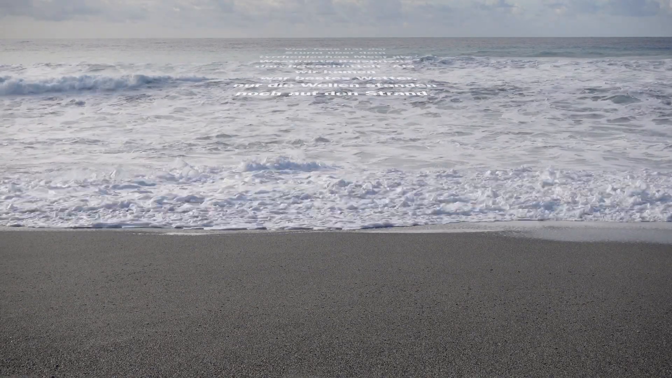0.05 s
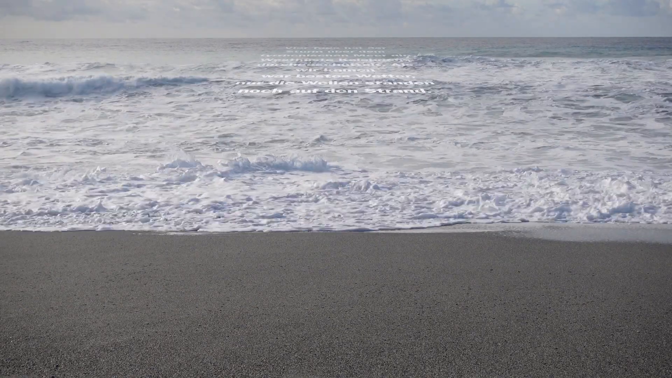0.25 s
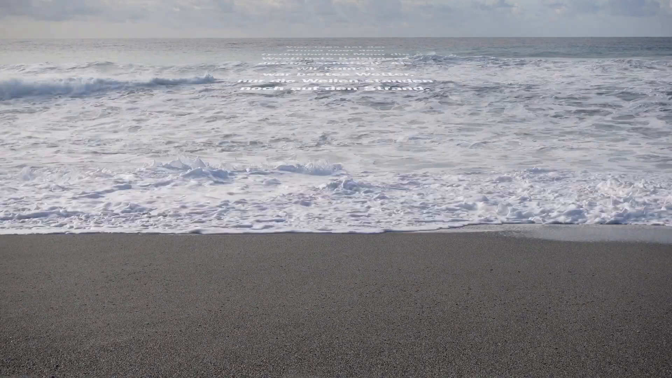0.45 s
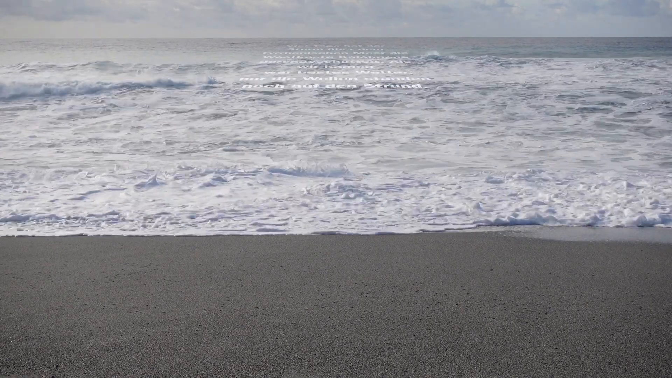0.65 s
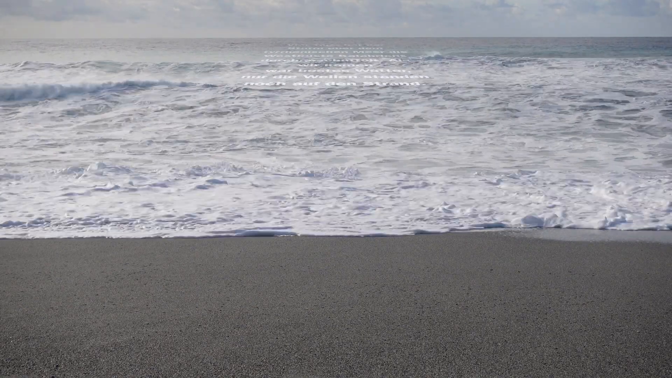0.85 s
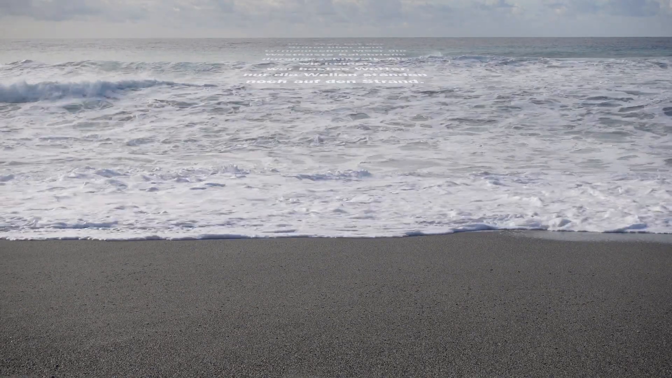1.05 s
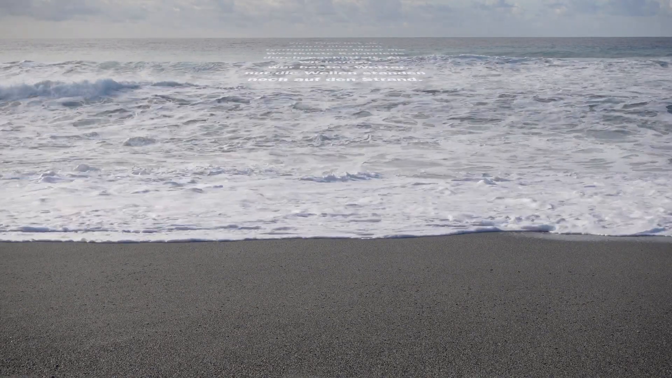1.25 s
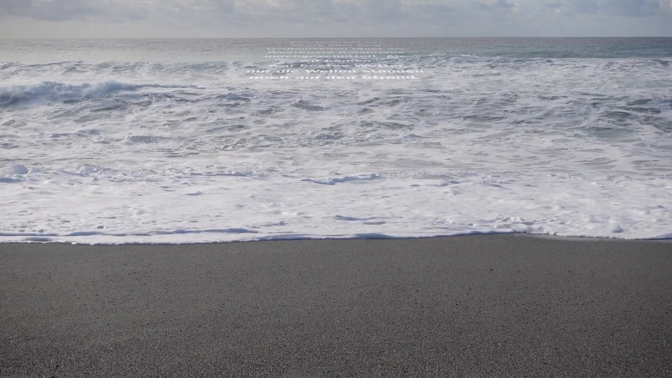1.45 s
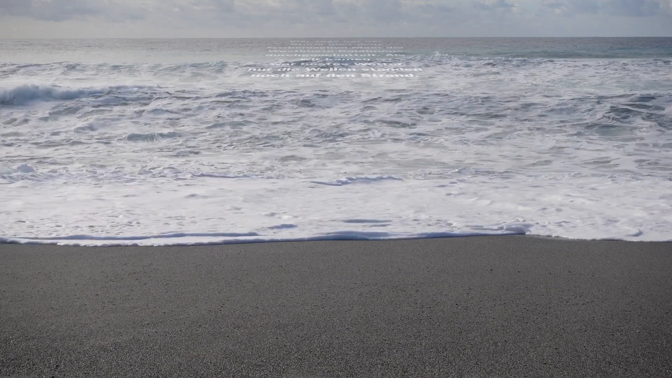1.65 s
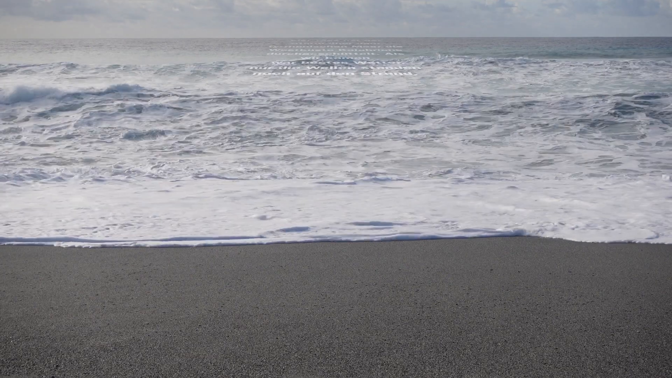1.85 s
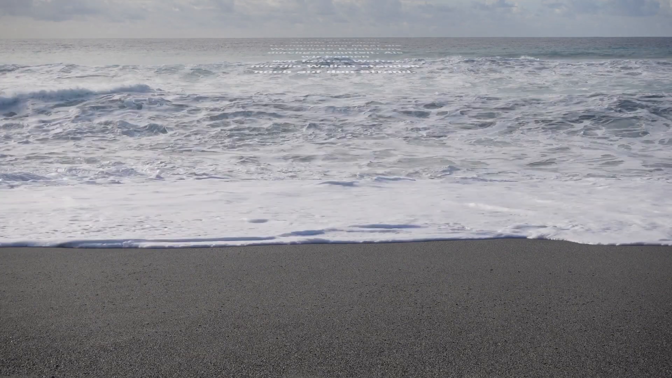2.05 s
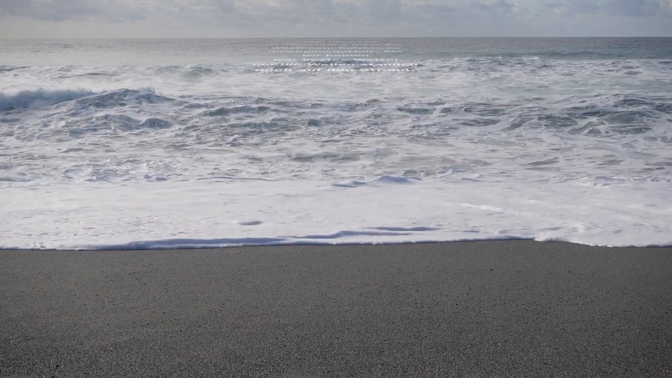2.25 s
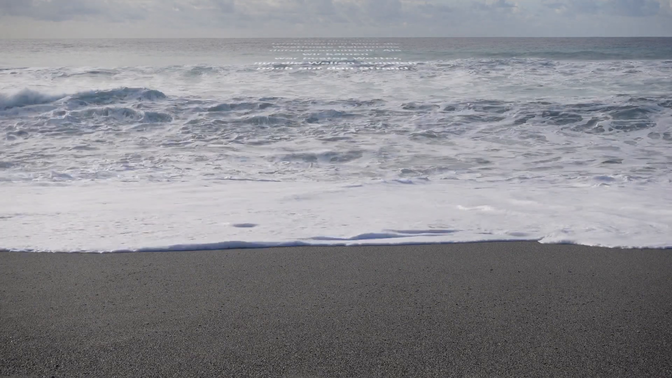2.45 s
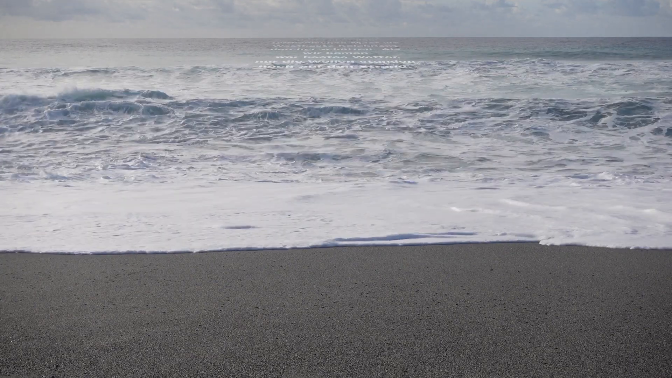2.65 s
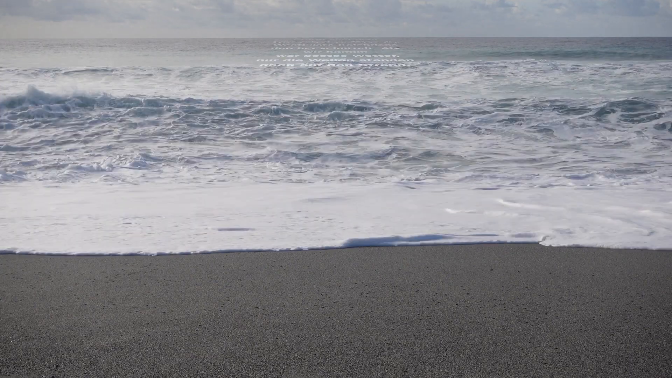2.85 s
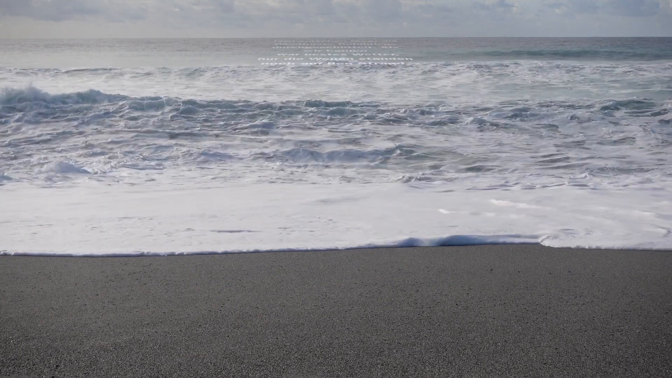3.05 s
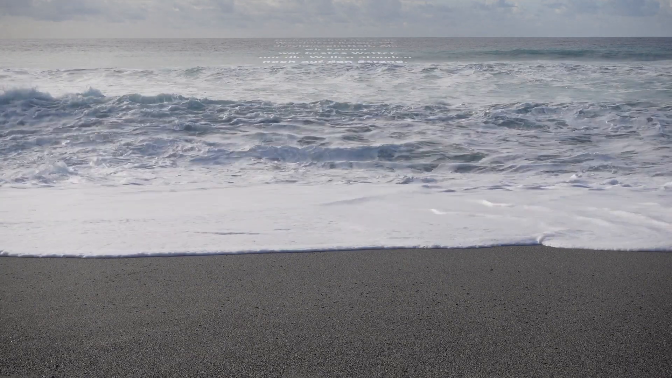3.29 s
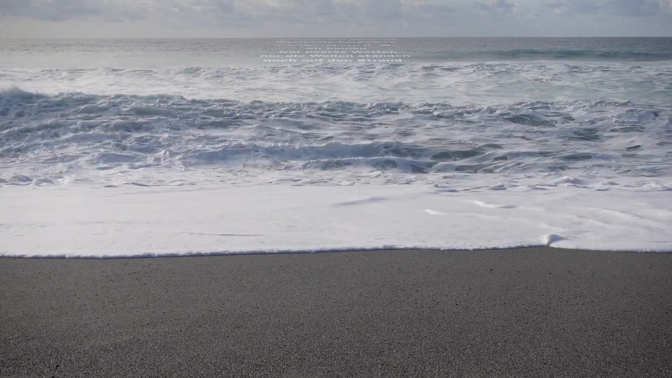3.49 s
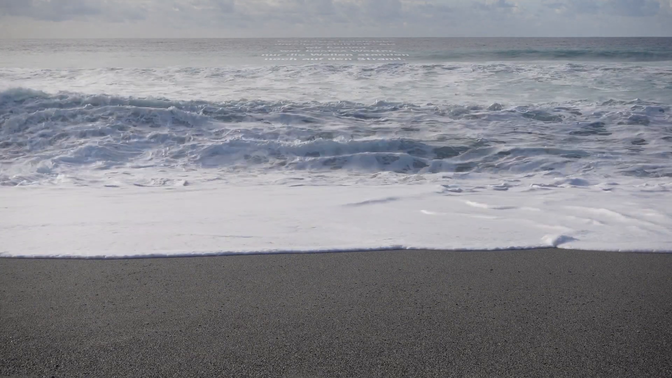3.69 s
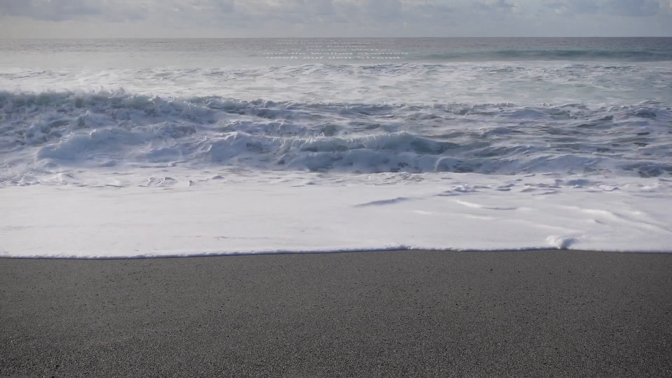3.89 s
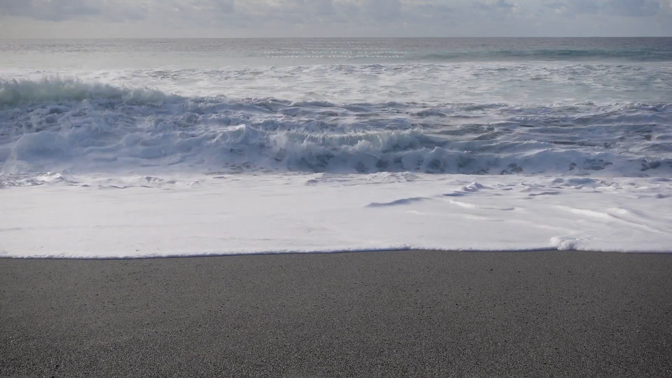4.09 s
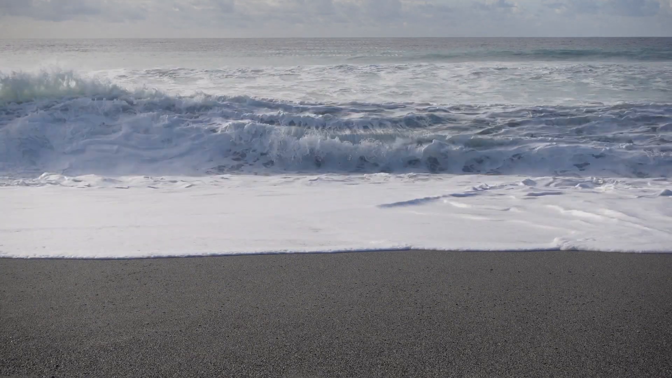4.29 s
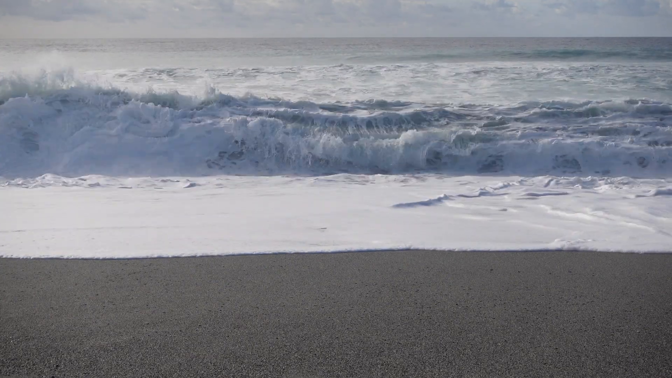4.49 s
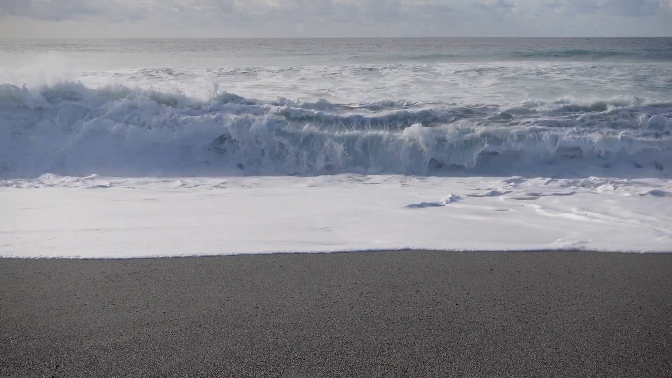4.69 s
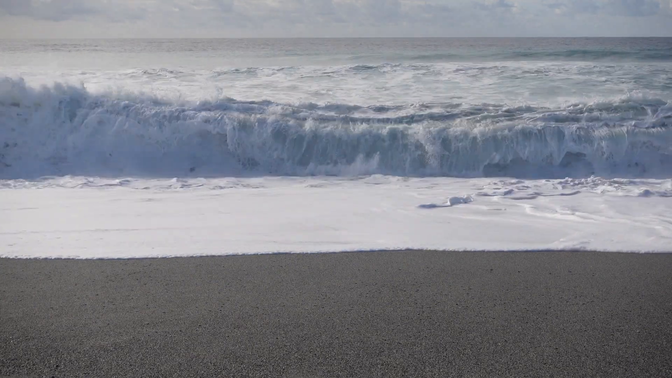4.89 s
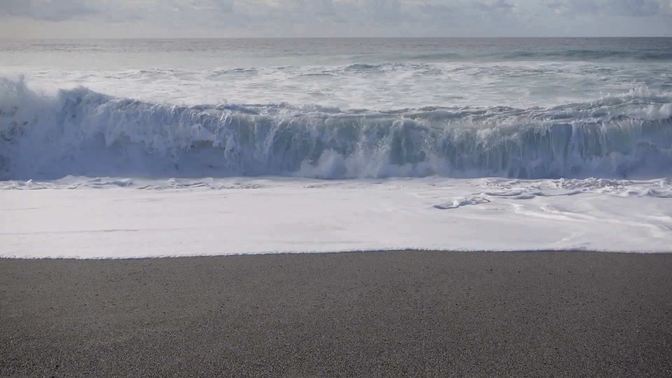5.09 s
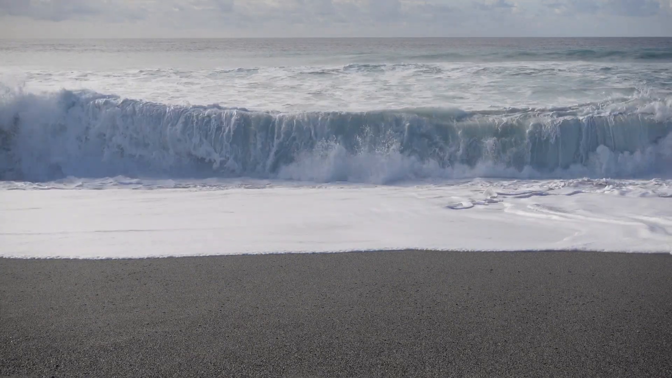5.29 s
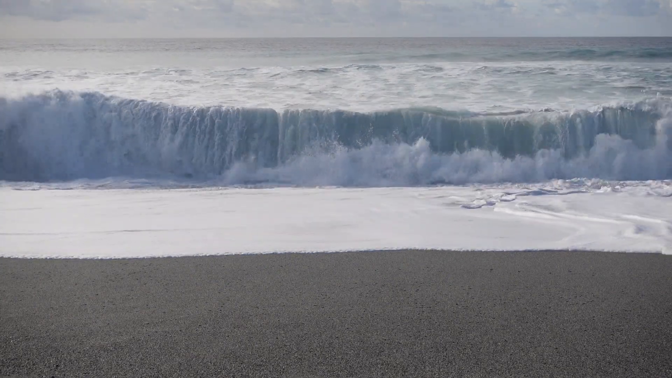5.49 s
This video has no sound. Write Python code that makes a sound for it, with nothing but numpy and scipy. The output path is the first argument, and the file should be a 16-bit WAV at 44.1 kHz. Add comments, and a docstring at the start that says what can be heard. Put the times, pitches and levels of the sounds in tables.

```python
"""Far breakers rumble and foam hisses up a sandy beach; then a wave rears up, curls over and roars.
Every sound is noise with a changing spectrum, made nearly alike in the left and right channels.
The roar is hollow and its upper edge climbs as it swells; spray takes over the hiss from the foam.
The rumble turns higher and thinner as the breaking moves nearer, and higher again as the crest falls."""
import sys
import numpy as np
from scipy import signal
from scipy.io import wavfile
from scipy.ndimage import uniform_filter1d

SR = 44100
rng = np.random.default_rng(int(sys.argv[2]) if len(sys.argv) > 2 else 0)


def generate_wav(signal):
    """Clip the signal to [-1, 1] and save it as 16-bit WAV at the path in sys.argv[1]."""
    frames = np.transpose(np.atleast_2d(signal))
    scaled = np.clip(frames, -1, 1) * 32767
    pcm = np.round(scaled).astype(np.int16)
    wavfile.write(sys.argv[1], SR, pcm)


N = 243873
FRAME, HOP = 2048, 256  # length and spacing of the short slices of sound [samples]
HZ = np.fft.rfftfreq(FRAME, 1 / SR)[:, None]
TIME = np.arange(N // HOP + 9) * HOP / SR

# Levels in the tables are relative: churn() raises all layers by the same amount.

# Hollow roar of the near wave: (time [s], level [dB])
ROAR_LEVEL = [(0.0, -46.5), (0.9, -53.5), (1.8, -53), (2.4, -49), (3.5, -46), (4.05, -37.5), (4.35, -32),
              (4.65, -29.7), (5.0, -27.5), (5.25, -26), (5.4, -24), (5.52, -26.5)]
LOW_WAVE_DB, TALL_WAVE_DB = -46.5, -26  # roar levels that stand for a low and a tall wave
TOP_LOW_HZ, TOP_HIGH_HZ = 320, 635  # highest pitch that clears the sand, for a low and a tall wave


def roar():
    """Air trapped under the curl; the echo off the sand cancels it steeply above an edge that rises with the wave."""
    level_db, = over_time(ROAR_LEVEL)
    height = np.clip((level_db - LOW_WAVE_DB) / (TALL_WAVE_DB - LOW_WAVE_DB), 0, 1)
    top_hz = TOP_LOW_HZ + (TOP_HIGH_HZ - TOP_LOW_HZ) * height ** .7
    body = (HZ / 250) ** 2 / (1 + (HZ / 250) ** 2.867)
    shadow = 1 / np.sqrt(1 + (HZ / top_hz) ** 11.32)
    return unit(body * shadow, 300, 600) * gain_of(level_db)


# Bursting bubbles of foam and spray together: (time [s], level [dB])
HISS_LEVEL = [(0.0, -38.5), (0.85, -38.6), (1.2, -37), (1.47, -36.6), (1.68, -37.8), (1.88, -36.5),
              (2.2, -37.2), (2.7, -35.6), (3.08, -35.3), (3.4, -32.8), (3.62, -34), (4.05, -30.5),
              (4.2, -30.7), (4.36, -27.4), (4.56, -27.6), (4.82, -25.3), (5.05, -26.2), (5.25, -25.0),
              (5.52, -25.3)]
# Sizzle near 3.3 kHz over the rest of the hiss: (time [s], level [dB])
SIZZLE_LEVEL = [(0, -1), (1.2, -.5), (2.6, 1.3), (3.9, 1.2), (4.8, .6), (5.15, -.5), (5.53, -.3)]
# Slope of the treble above 4 kHz: (time [s], extra level per octave [dB])
TREBLE_SLOPE = [(0, -.5), (1, -.1), (1.7, .8), (2.3, .2), (3.2, .2), (4.2, 0), (4.9, -.8), (5.3, .6),
                (5.53, .5)]
# Tone of the foam sliding up the beach: (frequency [Hz], relative level [dB])
FOAM_SPECTRUM = [(220, -25.5), (380, -6), (500, -1), (1000, -.5), (2300, -1.5), (3500, -2.5), (5200, -6.5),
                 (6300, -9), (7500, -13.5), (9000, -17), (10400, -20), (11500, -25.5), (13500, -31),
                 (15500, -37)]
# Tone of the spray off the crest: (frequency [Hz], relative level [dB])
SPRAY_SPECTRUM = [(470, -33), (800, -4), (990, -5.5), (1880, 0), (2630, -3), (3460, -1), (4110, -4.5),
                  (6100, -7.5), (7500, -12), (9000, -15.5), (10400, -18), (11500, -23), (13400, -28),
                  (15500, -37.5)]
REAR_S, CURL_S, CRASH_S = 1.9, 3.6, 4.4  # the wave starts to rear up, its crest curls over, has landed
SPRAY_CALM, SPRAY_REARED, SPRAY_CRASHED = .04, .15, .93  # spray's share of the hiss power at those times


def hiss():
    """Foam and spray share one level; blotches come and go where sheets of bubbles burst."""
    level_db, = over_time(HISS_LEVEL)
    sizzle_db, = over_time(SIZZLE_LEVEL)
    slope_db, = over_time(TREBLE_SLOPE)

    rearing = (SPRAY_REARED - SPRAY_CALM) * ramp(TIME, REAR_S, CURL_S)
    crashing = (SPRAY_CRASHED - SPRAY_REARED) * ramp(TIME, CURL_S, CRASH_S)
    spray_share = np.clip(SPRAY_CALM + rearing + crashing, 0, 1)

    sizzle = np.exp(-((HZ - 3250) / 500) ** 2)  # bubbles of about one millimetre radius ring here
    octaves = np.log2(np.maximum(HZ, 4000) / 4000)
    blotches_db = .25 * patches(60, 24) + .35 * patches(150, 5)
    shape = gain_of(level_db + sizzle_db * sizzle + slope_db * octaves + blotches_db)

    foam_tone = unit(gain_of(over_pitch(FOAM_SPECTRUM)[0]))
    spray_tone = unit(gain_of(over_pitch(SPRAY_SPECTRUM)[0]))
    foam = np.sqrt(1 - spray_share) * foam_tone * shape
    spray = np.sqrt(spray_share) * spray_tone * shape
    return foam, spray


# Low rumble of the whole surf line: (time [s], level [dB])
RUMBLE_LEVEL = [(0.0, -36.5), (0.4, -38.5), (2.1, -38.5), (2.7, -36.5), (3.1, -34.2), (3.75, -33.5),
                (4.3, -31.5), (4.65, -28), (5.0, -23), (5.4, -22.5), (5.52, -24.5)]
# Tone of the rumble before it is shifted: (frequency [Hz], relative level [dB])
RUMBLE_SPECTRUM = [(15, -72), (30, -52), (47, -25), (64, -17), (90, -7.5), (130, -2), (190, .5), (235, -5),
                   (290, -12.5), (360, -23), (490, -48.5), (840, -100)]
NEARING_S, NEAR_S = 2.1, 3.1  # the breaking moves in between these times
DEPTH_FAR_DB, DEPTH_NEAR_DB = .8, -3  # extra rumble from one octave under 190 Hz down, far and near
RISE_FAR, RISE_NEAR = .95, 1.06  # stretch of the tone above 130 Hz, far and near [factor]
CRASH_RISE = .22  # the falling crest adds this to the stretch until it settles
LIFT_S, SETTLE_S, GLIDE_S = 4.1, 4.95, .4  # start of that lift, start of its return, length of each glide


def rumble():
    """Far breakers: the soft sand lets only the bass through; nearer breaking is higher and thinner."""
    near = ramp(TIME, NEARING_S, NEAR_S)
    depth_db = DEPTH_FAR_DB + (DEPTH_NEAR_DB - DEPTH_FAR_DB) * near
    below = np.clip(np.log2(190 / (HZ + 1)), 0, 1)

    crash = ramp(TIME, LIFT_S, LIFT_S + GLIDE_S) - ramp(TIME, SETTLE_S, SETTLE_S + GLIDE_S)
    rise = RISE_FAR + (RISE_NEAR - RISE_FAR) * near + CRASH_RISE * crash
    # Reading the tone at a lower pitch moves it up
    shifted_hz = np.minimum(HZ, 130) + np.maximum(HZ - 130, 0) / rise
    tone = gain_of(over_pitch(RUMBLE_SPECTRUM, shifted_hz)[0])

    level_db, = over_time(RUMBLE_LEVEL)
    return unit(tone, 120, 260) * gain_of(level_db + depth_db * below)


# Balance of the two channels: (frequency [Hz], left minus right [dB])
LEFT_LEAN = [(60, -1), (220, -1), (380, -1.7), (520, -.2), (700, -1.3), (850, -.6), (2000, -.6), (3300, 0),
             (4100, 1.2), (5000, 0)]


def churn(tone, likeness):
    """Countless overlapping bubbles: noise of the given spectrum, nearly alike in both channels."""
    a, b, c, d = rng.standard_normal((len(TIME), len(HZ), 4)).T
    mid, side = a + 1j * b, c + 1j * d
    likeness = np.clip(likeness, 0, 1)
    both = np.sqrt((1 + likeness) / 2) * mid
    apart = np.sqrt((1 - likeness) / 2) * side
    lean = gain_of(over_pitch(LEFT_LEAN)[0] / 2)  # half on each side
    slices = np.array([(both + apart) * lean, (both - apart) / lean]) * tone
    sound = signal.istft(slices, nperseg=FRAME, noverlap=FRAME - HOP)[1]
    return sound[:, :N] * gain_of(5)


def patches(bins, frames):
    """A random field of blotches over pitch and time, rms 1."""
    field = rng.standard_normal((len(TIME), len(HZ))).T
    field = uniform_filter1d(field, bins, 0)
    field = uniform_filter1d(field, frames, 1)
    return field / field.std()


def gain_of(db):
    """Decibels to amplitude."""
    return 10 ** (np.asarray(db) / 20)


def over_time(rows):
    """Each column of a time table, one value a frame."""
    s, *columns = np.transpose(rows)
    return [np.interp(TIME, s, c) for c in columns]


def over_pitch(rows, hz=HZ):
    """Each column of a frequency table, read at the given pitches on a logarithmic scale."""
    f, *columns = np.transpose(rows)
    return [np.interp(np.log(hz + 1), np.log(f + 1), c) for c in columns]


def unit(tone, lo=0, hi=SR):
    """Scales each frame so that the power between lo and hi [Hz] is 1."""
    band = (HZ > lo) & (HZ < hi)
    return tone / np.sqrt((tone ** 2 * band).sum(0))


def ramp(x, start, end):
    """A smooth step from 0 at start to 1 at end."""
    u = np.clip((x - start) / (end - start), 0, 1)
    return u * u * (3 - 2 * u)


# Left-right likeness, 1 = the same: (frequency [Hz], foam [0 to 1], wave [0 to 1])
LIKENESS = [(50, .99, .995), (110, .99, .998), (200, .995, 1), (380, .95, 0.977), (520, 0.981, 1),
            (700, 0.912, 0.984), (850, 0.977, 0.996), (1100, 0.968, 1), (1600, 0.9895, 0.995),
            (3230, 0.9926, 1), (4200, 0.9906, 0.9895), (5400, 1, 1), (15000, 1, 1)]


def scene():
    """Foam and wave are each made nearly alike in both channels, the foam a little less so at most pitches."""
    foam_likeness, wave_likeness = over_pitch(LIKENESS)
    foam, spray = hiss()
    wave = np.sqrt(roar() ** 2 + spray ** 2 + rumble() ** 2)  # powers add
    return churn(foam, foam_likeness) + churn(wave, wave_likeness)


EDGE_HZ = 15740  # upper limit of the sound


def record(dry):
    """The microphone loses the deepest bass; then a steep filter removes the highest treble."""
    bass_cut = signal.butter(2, 40, "high", fs=SR, output="sos")
    thinned = signal.sosfilt(bass_cut, dry)
    treble_cut = signal.firwin(1023, EDGE_HZ, window=("kaiser", 9), fs=SR)
    return signal.oaconvolve(thinned, treble_cut[None], "same")


dry = scene()
out = record(dry)
generate_wav(out)
```